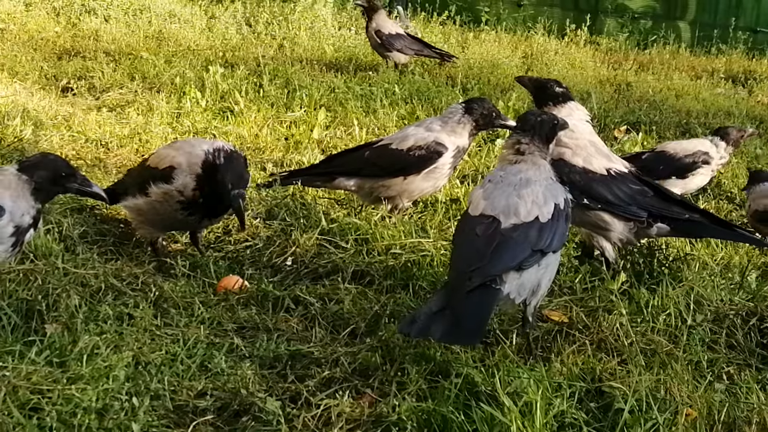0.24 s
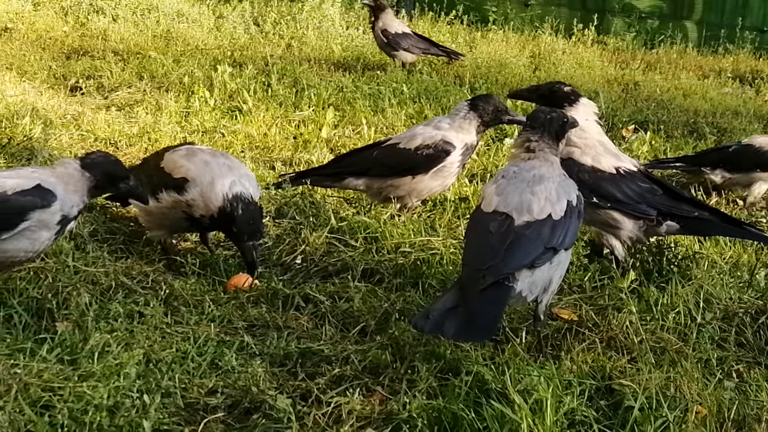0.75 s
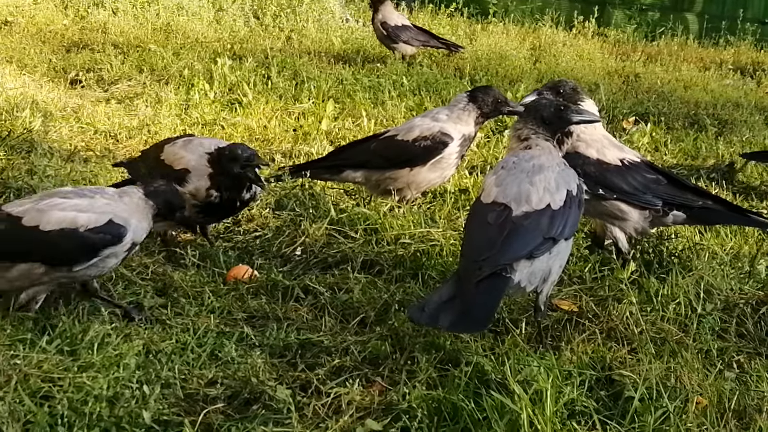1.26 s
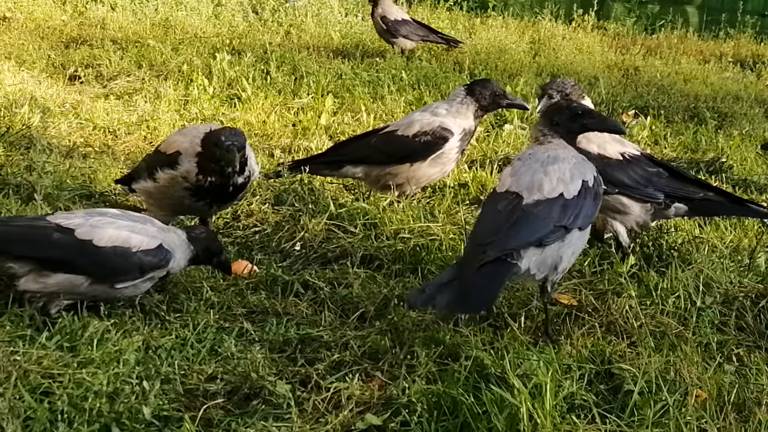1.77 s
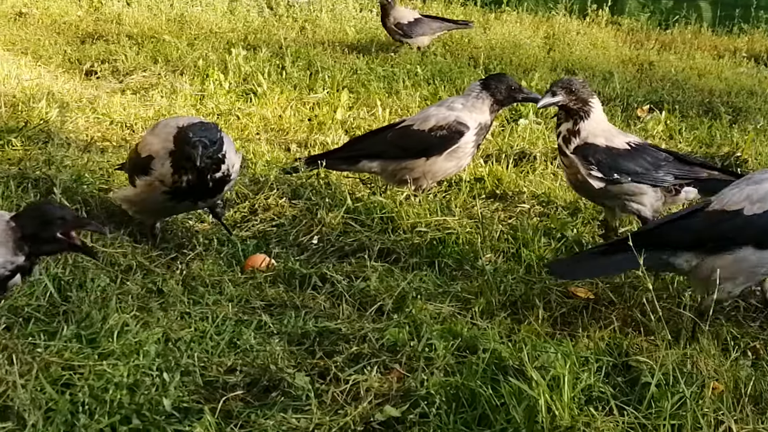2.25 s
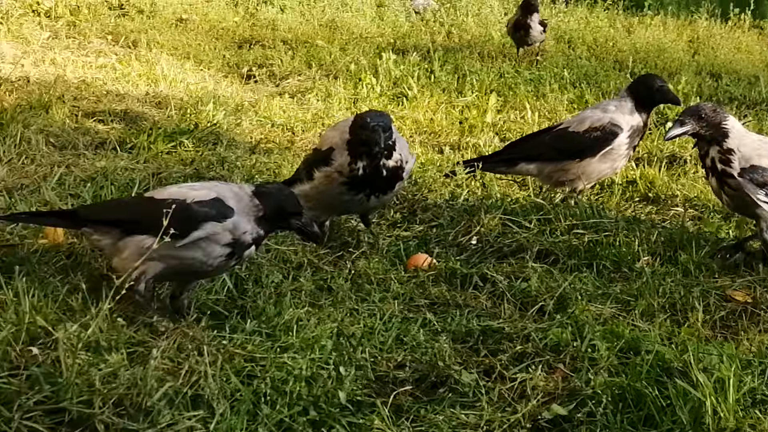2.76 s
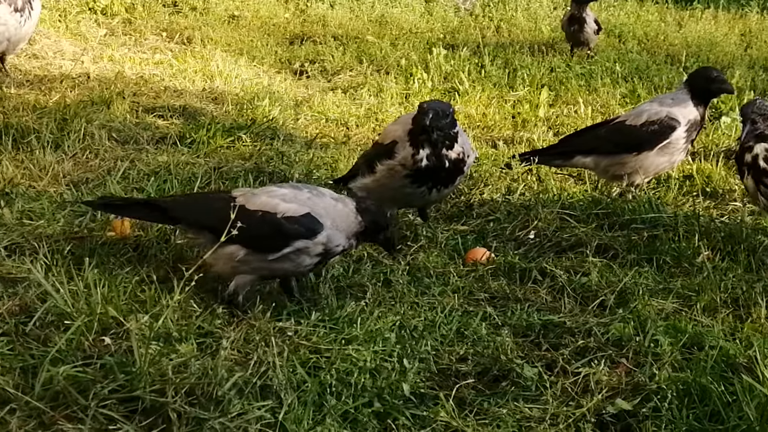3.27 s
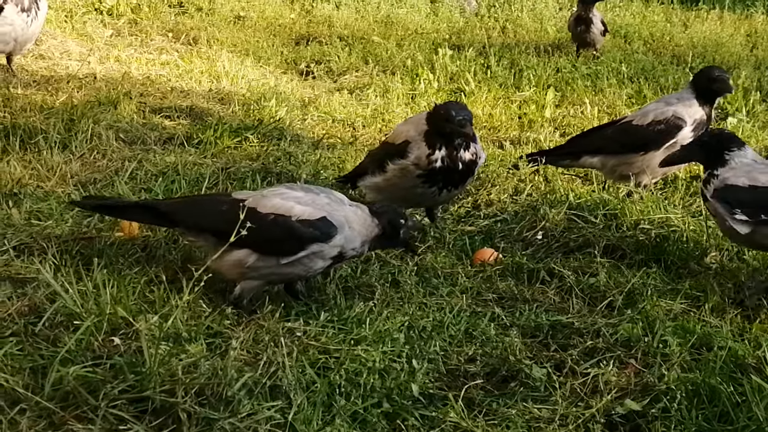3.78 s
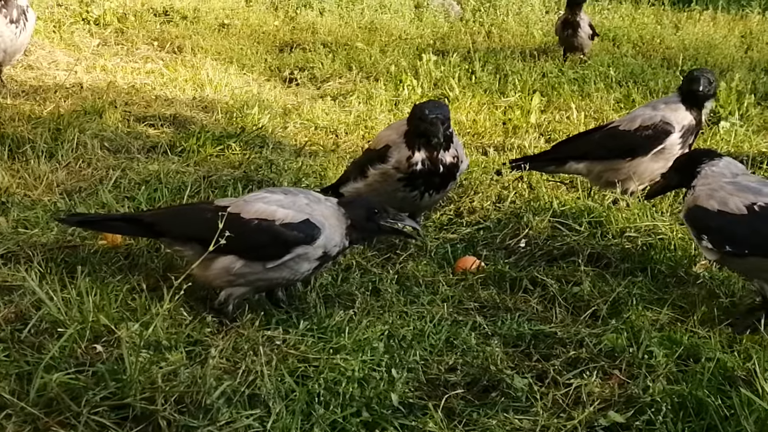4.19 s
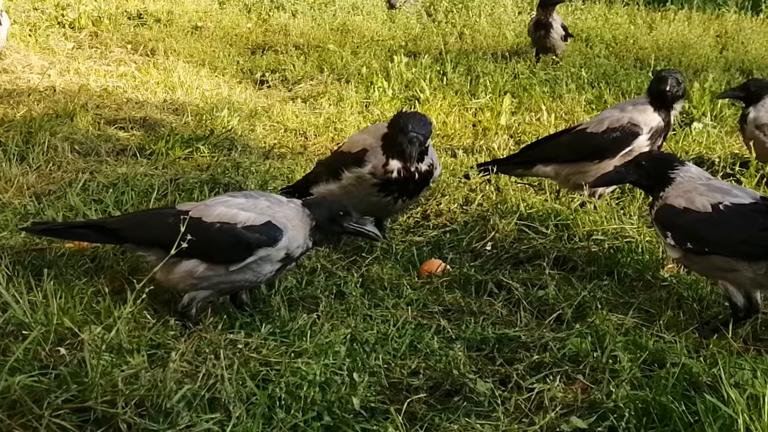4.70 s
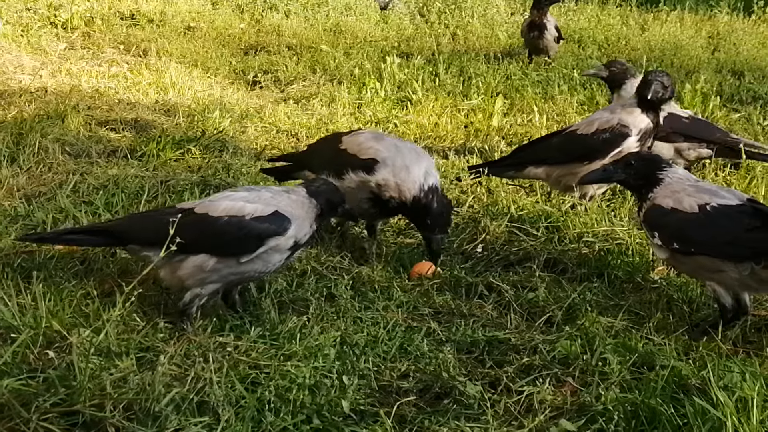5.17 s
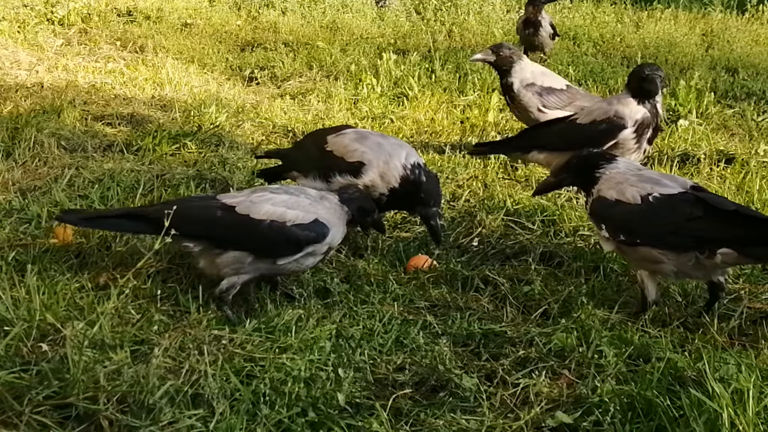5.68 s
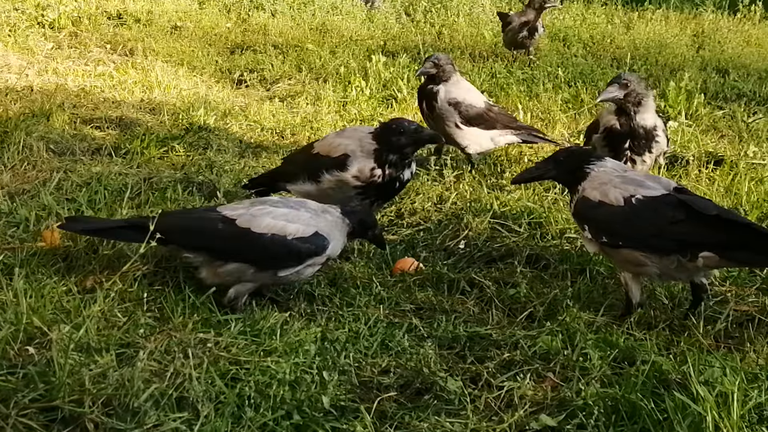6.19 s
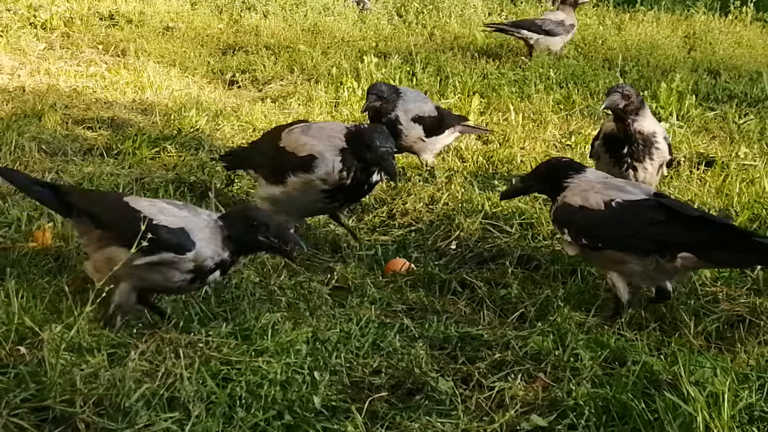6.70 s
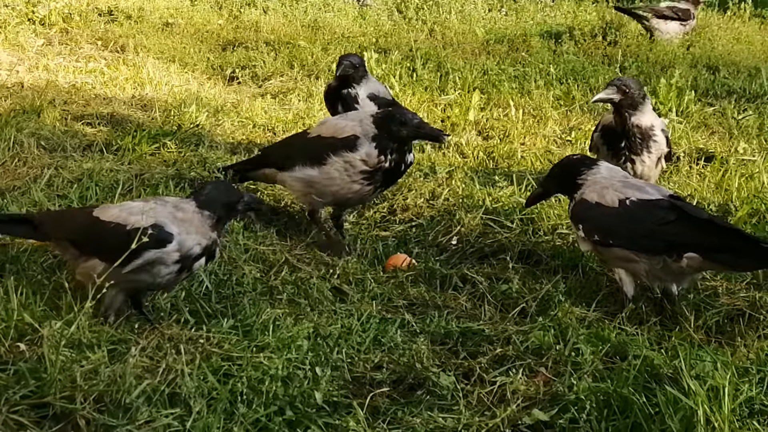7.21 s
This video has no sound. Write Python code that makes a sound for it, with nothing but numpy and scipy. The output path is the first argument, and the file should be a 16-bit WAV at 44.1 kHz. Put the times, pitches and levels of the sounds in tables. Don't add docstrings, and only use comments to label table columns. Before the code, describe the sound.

Quiet outdoor air with low traffic rumble and a light gust in the leaves. A few crows feed in grass: dry ticks, pecks and sharp beak snaps scattered left and right. Three brief, raspy, two-toned caws ring out, the first strongest, the second much softer, the third loud again, each with a faint diffuse return from lawn and trees. Low throaty mutters open and close the scene.

```python
import sys
import numpy as np
from scipy import signal
from scipy.fft import rfft, irfft
from scipy.io import wavfile
from scipy.ndimage import uniform_filter1d

SR = 44100
rng = np.random.default_rng(int(sys.argv[2]) if len(sys.argv) > 2 else 0)


def wrap_up_sound(samples):
    columns = np.atleast_2d(samples).T
    tamed = np.clip(columns, -1, 1)
    steps = np.round(tamed * 32767).astype(np.int16)
    wavfile.write(sys.argv[1], SR, steps)


def invert_db(x):
    u = np.asarray(x, float) / 20
    return 10 ** u


N = 328479

# time_s, level_db, pitch_hz
CAW_EFFORT = [
    [(2.015, -58, 207.7), (2.046, -34, 270.4), (2.07, -36, 262.4), (2.086, -31.5, 277.8),
     (2.12, -28.5, 302.3), (2.15, -33, 314.6), (2.23, -31.5, 352), (2.325, -33.5, 336.6), (2.381, -48, 276)],
    [(3.495, -52, 298.2), (3.501, -62.5, 298.4), (3.519, -46, 303.3), (3.579, -39.5, 320.1),
     (3.651, -41.5, 322), (3.699, -41.5, 329.6), (3.773, -42.5, 319.7), (3.883, -49, 290.6),
     (3.9, -66, 279)],
    [(6.667, -54, 201.8), (6.69, -39.5, 241), (6.721, -35, 288.3), (6.767, -34, 313.6),
     (6.879, -32.5, 338.9), (6.963, -36.5, 311), (6.983, -39, 295.5), (7.015, -46, 247), (7.03, -57, 230)],
]
# time_s, pitch_hz
UPPER_PITCH = [
    [(2.11, 322.1), (2.174, 408.4), (2.242, 431), (2.326, 431.3), (2.385, 344.5)],
    [(3.495, 374.5), (3.593, 409.8), (3.693, 430.6), (3.787, 432.3), (3.877, 365)],
    [(6.7, 353.5), (6.794, 410.8), (6.884, 420.4), (6.964, 390.7), (7.03, 319.4)],
]
# start_s, end_s, upper_to_lower_ratio
LOCKS = [
    (3.66, 3.785, 4 / 3),
    (6.82, 6.93, 5 / 4),
]
# size_beat (0-1), pull_cycles, beat_phase_rad, upper_level_db, upper_tilt
COUPLING = [(0.56, 0.076, 1, -0.5, 0.059), (0.42, 0.07, 0.9, 1, 0.92), (0.65, 0.051, 1, 0.5, 0.15)]
# ring_hz, width_hz, level_db
WINDPIPE = [
    [(1580, 46, -5), (2370, 210, 0), (5040, 270, -35), (4120, 66, -8)],
    [(1195, 39, -2), (1850, 28, 3.5), (3980, 98, -6.5), (2290, 130, -7), (4700, 140, -3.5)],
    [(1545, 29, 8), (2460, 200, 0.5), (4350, 50, -1), (5170, 110, -2)],
]
# fullest_chest_db, top_above_effort_db, aim_at_trees_db
POSTURE = [(-45, 0, -1.5), (-44, -1.5, 1), (-46, -6, -1.5)]
HOARSE_LOCKED = [.09, .11, .11]
HOARSE_BEATING = [.11, .17, .14]
# freq_hz, level_db
ONSET_COLOUR = ([(230, -20), (800, -9.5), (1130, -28), (1330, -15), (2000, -4), (2750, -18), (3300, -21),
                (3600, -40), (4000, -27), (4480, -19), (4820, -11), (5630, -12), (6090, -29), (7120, -27),
                (8050, -42), (9000, -42), (15160, -79)], [(230, -25), (800, -15), (1080, -31), (1330, -9),
                (1850, -4), (2150, -11), (2760, -25), (3900, -11), (4360, -27), (4820, -14), (5860, -10),
                (6200, -19), (7010, -20), (9070, -31), (15160, -54)])
FIRST_COLOUR = ( [(230, -16), (460, -10.5), (750, -16), (1090, -33), (1380, -9), (1900, 7), (3450, -24),
                (4250, -5), (4940, -5.5), (5970, -20), (6430, -13), (7300, -22), (7600, -30), (8100, -85),
                (9300, -38), (15160, -68)], [(230, -23), (340, -14.5), (1030, -24), (1490, 5), (1840, 6),
                (2180, -2), (2760, -15), (3050, -6), (3380, -18), (4050, -2), (4400, -9), (5600, -8),
                (6090, -15), (6600, -5), (11020, -40), (15160, -49)])
SECOND_COLOUR = ( [(230, -12.5), (1150, -14), (1450, -28), (1950, -8), (2500, -20), (3560, -16),
                 (4020, -7.5), (4940, -22), (5630, -10), (6320, -15), (6660, -27), (7500, -33), (8380, -48),
                 (15160, -68)], [(230, -20.5), (340, -14.5), (1950, -17), (2280, -10), (2760, -36),
                 (3100, -13), (3560, -18), (4020, -1), (4360, -10), (4820, -6), (5400, -18), (5630, -9),
                 (7460, -28.5), (15160, -58)])
THIRD_COLOUR = ( [(230, -11.5), (340, -8), (690, -10.5), (1130, -25), (1550, -10), (1980, 5), (2400, -8),
                (3100, -17), (3650, -19), (4250, 1), (4600, 0), (5510, 6.5), (6090, -12), (7350, -8),
                (7950, -16), (8300, -22), (9000, -62), (9600, -44), (15160, -62)], [(230, -20),
                (340, -10.5), (950, -15), (1130, -25), (1490, -3), (2070, 2), (2500, -16), (2800, -20),
                (3100, -10), (3330, -14), (3900, 2), (4590, 0), (5510, 7), (7690, -12), (8040, -10),
                (15160, -47)])
# freq_hz, phase_rad
PORT_TURN = [
    [(300, .37), (950, 1), (1150, .2), (1400, .6), (1900, .2), (2350, -1.05), (2700, -.8), (2900, -.25),
     (3400, -3.2), (3600, -2), (3900, -5.6), (4200, -6.2), (4500, -5.65), (5000, -5.1), (6700, -3.3)],
    [(300, .35), (1500, 1.55), (1850, -.15), (2050, -.2), (2600, -1.95), (3000, .85), (3500, -.75),
     (3620, 1.35), (4250, -.2), (4400, -3.2), (5050, -6.4), (5400, -3.4), (5750, -3), (6650, -1.4)],
    [(300, .26), (1100, .9), (1250, .25), (1550, .55), (1900, -.1), (2100, -.2), (2400, -1.95),
     (2900, -.05), (3550, -3.7), (3700, -2.2), (4150, -6.2), (4800, -5.45), (5300, -5.1), (5650, -4.2),
     (6500, -3.5)],
]
ONSET_TURN = [(300, .35), (1000, .8), (1400, .8), (1900, .1), (2250, -1.15), (2500, -.6), (2850, .3),
              (3200, -2.3), (3900, -5), (4500, -5.1), (5000, -4.8), (5900, -3.4), (7000, -2.5)]
CAW_LAG_MS = [0.3, 0.24, 0.26]

# start_s, length_s, start_level_db, end_level_db, chest_db
MUTTERS = [(0.016, 0.014, -56, -58, -58), (0.028, 0.098, -46, -69, -59), (0.109, 0.153, -66, -74, -70.5),
           (2.886, .045, -79, -83, -80), (2.982, 0.035, -84, -70, -66.5), (3.013, .03, -72, -86, -67),
           (6.416, 0.13, -84, -69.5, -58), (6.536, 0.14, -67.5, -65, -57), (7.074, 0.159, -88, -58, -61.5),
           (7.211, 0.017, -52, -55, -53.5), (7.224, 0.041, -55, -49.5, -52.5),
           (7.26, 0.042, -53, -60, -58.5), (7.291, 0.083, -59.5, -63, -60.5),
           (7.36, 0.033, -52, -65, -58.5), (7.386, 0.059, -58, -61.5, -59.5),
           (7.436, 0.013, -53, -46.5, -77)]
# time_s, pitch_hz
MUTTER_PITCH = [(0, 204.5), (3.1, 203.4), (6.42, 183.3), (6.45, 214.4), (6.49, 199.5), (6.57, 212),
                (6.66, 182.8), (7.07, 181), (7.11, 232), (7.142, 184.2), (7.18, 224.8), (7.25, 207),
                (7.325, 233.3), (7.345, 280.7), (7.45, 269.5)]
# freq_hz, level_db
MUTTER_COLOURS = [([(230, -11.5), (570, -12.5), (850, -29), (1500, -33.5), (2070, -36.5), (3000, -30.5),
                  (3750, -31), (4130, -32), (4820, -46), (5400, -32), (6430, -52), (15160, -76)],
                  [(230, -20), (460, -7.5), (880, -33), (1200, -28), (1550, -38), (1980, -45),
                  (2530, -31.5), (2900, -29), (3680, -23), (4250, -48), (7350, -29.5), (7810, -75),
                  (15160, -73)]), ([(230, -16.5), (570, -15.5), (1720, -34), (2300, -22), (2870, -21),
                  (3680, -40), (4590, -29), (5400, -35), (6200, -36), (15160, -82)], [(230, -22.5),
                  (570, -16.5), (2760, -39.5), (3560, -19.5), (4360, -47), (5400, -23), (5740, -38),
                  (7580, -27), (8040, -41), (15160, -59)]), ([(230, -26.5), (800, -30), (1490, -13.5),
                  (2300, -16.5), (2850, -28), (3300, -34), (4590, -20), (5400, -46), (6090, -29),
                  (6890, -70), (15160, -58)], [(230, -23.5), (460, -9), (1150, -32.5), (1380, -10.5),
                  (1840, -31), (2300, -18), (3330, -37), (4600, -26), (5280, -28), (6000, -29), (6900, -29),
                  (15160, -83)])]
MUTTER_LAG_MS = [0.16, 0.23, -0.31]
MUTTER_TOP_DB = [-11, 0.5, 6.5, -1, -9]
PHRASE_BORDERS_S = [1, 6, 6.5, 7]
PHRASE_BIRD = [0, 1, 1, 1, 2]
BEAK_RING_HZ = [3850, 3770, 4620]
SECOND_RING_HZ = [1600, 4100, 6000]

# time_s, peak_db, left_right_db, low_hz, top_hz
CLICKS = [(0.035, -37, 3, 1000, 4500), (.0635, -57, -2, 4800, 7800), (.9588, -38, -13, 3030, 5000),
          (.9588, -46.5, -13, 4700, 7560), (2.44, -50, -3, 700, 7000), (2.56, -55, 13, 3560, 6300),
          (4.2138, -52, -12, 900, 6000), (5.0908, -50.5, -9, 4800, 7600), (5.9727, -57, -2, 1800, 8850),
          (6.6668, -42, 0, 1200, 8940)]
# time_s, peak_db, left_right_db, ring_hz, ring_t60_s
TICKS = [(.064, -47.5, -3, 5530, 0.31), (.332, -59, 6, 2340, 0.39), (0.3623, -53, 2, 2300, .05),
         (0.8435, -57, 3, 5200, .02), (0.8524, -51, 4, 2290, 0.059), (0.875, -59, -7, 5500, .03),
         (0.9543, -51.5, -6, 2100, 0.12), (0.962, -47, -13, 4100, 0.032), (0.974, -48, -2, 4000, 0.092),
         (0.9981, -53, -2, 4020, 0.06), (1.013, -58, -4, 3900, .05), (1.3475, -55, -5, 5000, .03),
         (1.5577, -58, -8, 2100, .03), (2.434, -54, -12, 2059, 0.057), (3.013, -53.5, 3, 2660, 0.13),
         (3.015, -57, -3, 4700, 0.072), (3.2897, -56, -10, 2250, .03), (4.2172, -53, -6, 3520, 0.03),
         (5.023, -49.5, -4, 2360, 0.024), (5.091, -50, -5, 1600, 0.04), (5.4185, -62, -10, 2030, .03),
         (6.3803, -63, 7, 2520, 0.023), (7.437, -51, -12, 7040, 0.27)]
# time_s, peak_db, left_right_db
SNAPS = [(2.7671, -70, -9), (3.1353, -71, 10), (5.973, -81, -8), (7.4424, -58, -5)]
# freq_hz, level_db
LAWN = [(400, -25), (1500, 13.5), (2300, 11), (3300, 12.5), (4500, 7.5), (5500, 11.5), (7000, 16.5),
        (8000, 21), (10000, -23)]
TREE_ECHO = [(300, -24), (900, -14), (1500, 0), (2000, -1), (2600, 0), (3200, -13), (6000, -20),
             (9000, -32)]
# freq_hz, density_db_per_hz
RUMBLE = [(8.2, -51), (14, -16.5), (27, -8.5), (40, -14), (70, -0.5), (118, -9.5), (215, -14), (275, -19),
          (304, -18.5), (341, -21.5), (505, -26.5), (700, -28), (910, -61), (1540, -120)]
LEAVES = [(380, -32), (650, -5), (825, -2), (954, -1.5), (1160, -5), (1340, -6), (2160, -12.5),
          (2440, -14.5), (2780, -18), (5680, -21.5), (9890, -30.5), (15300, -54)]
# freq_hz, likeness (-1 to 1)
COHERENCE = [(60, 0.94), (130, 0.9), (290, 0.83), (640, 0.46), (1400, -0.53), (3090, 0.058), (6790, -0.022),
             (14900, -0.33)]
# freq_hz, left_right_db
BALANCE = [(60, -1), (180, -2), (550, 0), (1640, -6), (4960, -0.5), (14900, -7)]

ONSET_ENDS_S = 2.118
UPPER_FREE, UPPER_LOCKED = 0.74, 0.76
UPPER_WOBBLE, SLIP_WOBBLE = .013, .04
SLIP_HOARSE, SLIP_S = .1, .022
HOARSE_ENDS, HOARSE_SPREAD_S, HOARSE_ALONE = .29, .014, .022
CHEST_LEAD_DB, CHEST_TRAIL_DB, CHEST_TURN_S = 9.5, -4, 0.024
TOP_FULL_DB, TOP_FADE_DB = -37.5, -3
RINGS_FOLLOW = 0.19
MUTTER_HOARSE, MUTTER_WOBBLE, CHEST_FOLLOWS = .31, 0.036, 0.39
RISE_SHARE = .1
RING_HZ, RING_WIDTH_HZ, RING_DB, BEAK_WIDTH_HZ = 2320, 150, 5, 210
CLICK_T60_S = 0.0093
SCUFF_SHARE, PECK_SHARE, PECK_ABOVE_HZ = .1, .1, 3200
TREES_S, TREES_SPREAD_S = .17, .065
AIR_DB, LEAVES_DB, SWELL_DB = -51.5, -24, 1
STILL_DB, GUST_DB, GUST_GRASS_DB = -18.5, 5.5, 2.5
GUST_START_S, GUST_RISE_S, GUST_END_S, GUST_FALL_S = 1.73, 0.67, 3.42, 0.16


def caw(k):
    s, effort_db, pitch_hz = np.transpose(CAW_EFFORT[k])
    t = np.arange(s[0], s[-1], 1 / SR)
    beak_db = np.interp(t, s, effort_db)
    along = (t - s[0]) / (s[-1] - s[0])
    full_db, top_db, aim_db = POSTURE[k]
    lead_db = CHEST_TRAIL_DB + (CHEST_LEAD_DB - CHEST_TRAIL_DB) * np.exp(-(t - s[0]) / CHEST_TURN_S)
    chest_db = np.minimum(full_db, beak_db + lead_db)
    top_db = np.minimum(TOP_FULL_DB, beak_db + top_db + TOP_FADE_DB * along ** 3)

    upper_start = UPPER_PITCH[k][0][0]
    rough = np.interp(t - upper_start, [0, .03], [HOARSE_ALONE, HOARSE_BEATING[k]])
    rough = rough + SLIP_HOARSE * slipping(t)
    for start, end, ratio in LOCKS:
        rough = rough + locking(t, start, end) * (HOARSE_LOCKED[k] - rough)
    nearest_end = np.minimum(t - s[0], s[-1] - t)
    rough = rough + (HOARSE_ENDS - rough) * np.exp(-nearest_end / HOARSE_SPREAD_S)

    colours = (FIRST_COLOUR, SECOND_COLOUR, THIRD_COLOUR)[k]
    sound = call(t, (chest_db, beak_db, top_db), np.interp(t, s, pitch_hz), rough, colours, CAW_LAG_MS[k],
                 upper=UPPER_PITCH[k], coupling=COUPLING[k], rings=WINDPIPE[k],
                 onset=ONSET_COLOUR if k == 0 else None, turn=PORT_TURN[k])
    return sound, invert_db(aim_db)


def mutter(start, length, from_db, to_db, chest_db):
    t = np.arange(start, start + length, 1 / SR)
    phrase = np.searchsorted(PHRASE_BORDERS_S, start)
    bird = PHRASE_BIRD[phrase]
    beak_db = np.linspace(from_db, to_db, len(t))
    chest_db = chest_db + CHEST_FOLLOWS * (beak_db - beak_db.mean())
    levels = chest_db, beak_db, beak_db + MUTTER_TOP_DB[phrase]
    wobble = MUTTER_WOBBLE * wander(SR, 857)[:len(t)]
    hz = np.interp(t, *np.transpose(MUTTER_PITCH)) * (1 + wobble)
    rings = [(RING_HZ, RING_WIDTH_HZ, RING_DB),
             (BEAK_RING_HZ[bird], BEAK_WIDTH_HZ, RING_DB),
             (SECOND_RING_HZ[bird], BEAK_WIDTH_HZ, RING_DB)]
    rough = np.full(len(t), MUTTER_HOARSE)
    sound = call(t, levels, hz, rough, MUTTER_COLOURS[bird], MUTTER_LAG_MS[bird], rings=rings)
    rise_s = min(2 * RISE_SHARE * length, .015)
    return sound * np.minimum(np.minimum(t - start, t[-1] - t) / rise_s, 1)


def call(t, levels_db, hz, rough, colours, lag_ms, upper=None, coupling=None, rings=(), onset=None, turn=None):
    edge = np.clip((t - t[0]) / 0.00028, 0, 1) * np.clip((t[-1] - t) / 0.0023, 0, 1)
    drive = folds(t, hz, rough, upper, coupling) * edge
    for ring_hz, width, ring_db in rings:
        ring_hz = ring_hz * (hz / hz.max()) ** RINGS_FOLLOW
        drive = drive + invert_db(ring_db) * resonate(drive, ring_hz, width)
    drive = bounce(drive, 70, .68)
    ports = at_ports(drive, colours, lag_ms, turn)
    if onset:
        early = np.clip((ONSET_ENDS_S - t) / .05 + .5, 0, 1)
        ports = ports * (1 - early) + early * at_ports(drive, onset, lag_ms, ONSET_TURN)

    f, z = np.fft.rfftfreq(len(t), 1 / SR), rfft(ports)
    chest = 1 / (1 + (f / 1100) ** 8)
    top = 1 - 1 / (1 + (f / 3400) ** 12)
    out = 0
    for share, db in zip((chest, 1 - chest - top, top), levels_db):
        band = irfft(z * share, len(t))
        level = np.sqrt(uniform_filter1d((band ** 2).mean(0), 2600, mode="reflect") + 1e-12)
        out = out + invert_db(db + 5.5) * band / level
    return out


def folds(t, hz, rough, upper, coupling):
    turns = np.cumsum(hz) / SR
    voiced = pulses(turns + .1 * rough * wander(len(t), 90), hz)
    if upper is not None:
        throb, pull, phase, upper_db, tilt = coupling
        s, upper_hz = np.transpose(upper)
        locked = sum(locking(t, start, end) for start, end, ratio in LOCKS)
        strength = np.clip((t - s[0]) / 0.0043, 0, 1) * (UPPER_FREE + (UPPER_LOCKED - UPPER_FREE) * locked)
        wobble = (UPPER_WOBBLE + SLIP_WOBBLE * slipping(t)) * wander(len(t), 483)
        upper_hz = np.interp(t, s, upper_hz) * (1 + wobble)
        for start, end, ratio in LOCKS:
            upper_hz = upper_hz + locking(t, start, end) * (ratio * hz - upper_hz)
        upper_turns = np.cumsum(upper_hz) / SR
        beat = 2 * np.pi * (upper_turns - turns)
        shake = pull * strength * np.sin(beat) + .1 * rough * wander(len(t), 90)
        voiced = pulses(turns + shake, hz) * (1 + throb * strength * np.cos(beat + phase))
        voiced += invert_db(upper_db) * strength * pulses(upper_turns + shake / 2, upper_hz, max(tilt, 0))
    voiced = voiced * invert_db(6 * rough * wander(len(t), 70))
    puffs = (.4 + np.exp(-(turns % 1) / .3)) * rng.standard_normal(len(t))
    puffs = signal.lfilter(*signal.butter(2, 800, "high", fs=SR), puffs)
    return -(1 - rough) * voiced + 9 * rough * puffs


def pulses(turns, hz, tilt=0.):
    out = 0
    for k in range(1, 60):
        out = out + np.cos(2 * np.pi * k * turns) * (k * hz < 15500) / k ** tilt
    return out


def locking(t, start, end):
    return np.clip(np.minimum(t - start, end - t) / 0.017, 0, 1)


def slipping(t):
    out = 0
    for start, end, ratio in LOCKS:
        for at in (start - SLIP_S, end + SLIP_S):
            out = out + np.exp(-((t - at) / SLIP_S) ** 2)
    return out


def resonate(x, hz, width):
    turn = np.exp(2j * np.pi * np.cumsum(hz) / SR)
    r = np.exp(-np.pi * abs(width) / SR)
    return 2 * (turn * signal.lfilter([1 - r], [1, -r], x / turn)).real


def bounce(x, delay, gain):
    b = np.r_[gain, np.zeros(delay - 1), 1]
    return signal.lfilter(b, b[::-1], x)


def at_ports(drive, colours, lag_ms, turn):
    left, right = colours
    return np.array([colour(drive, left), colour(drive, right, lag_ms, turn, left)])


def colour(x, points, lag_ms=0., turn=None, like=None):
    hz = np.fft.rfftfreq(4096, 1 / SR)
    floor = np.sqrt(1 + (215 / (hz + 1)) ** 10)
    gain = np.log(invert_db(read(points, hz)) / floor)
    shape = np.log(invert_db(read(like, hz)) / floor) if turn else gain
    phase = -signal.hilbert(np.r_[shape, shape[-2:0:-1]]).imag[:len(hz)]
    phase = phase - 2 * np.pi * hz * (lag_ms + 1.5) / 1000
    if turn:
        phase = phase + read(turn, hz)
    response = irfft(np.exp(gain + 1j * phase))[:2048]
    return signal.oaconvolve(x, response)[:len(x)]


def clicks():
    out, t = np.zeros((2, N)), np.arange(2000) / SR
    for s, db, pan_db, low_hz, top_hz in CLICKS:
        burst = np.sign(rng.standard_normal(len(t))) * invert_db(-60 * t / CLICK_T60_S)
        burst = signal.sosfilt(signal.butter(3, [low_hz, top_hz], "band", fs=SR, output="sos"), burst)
        add(out, s, port_gain(db, pan_db) * burst)
    return out


def ticks():
    out, t = np.zeros((2, N)), np.arange(6000) / SR
    click_band = signal.butter(4, [1900, 7800], "band", fs=SR, output="sos")
    for s, db, pan_db, hz, t60 in TICKS:
        noise = rng.standard_normal((2, len(t)))
        broad = PECK_SHARE if hz > PECK_ABOVE_HZ else SCUFF_SHARE
        ring = signal.sosfilt(signal.butter(2, [hz / 1.08, hz * 1.08], "band", fs=SR, output="sos"), noise)
        ring = evened(ring) * invert_db(-60 * t / max(t60, .003))
        click = signal.sosfilt(click_band, noise * invert_db(-60 * t / 0.021))
        sound = (1 - broad) * ring + 2.0 * broad * click
        add(out, s - .0005, port_gain(db - 6.0, pan_db) * sound)
    for s, db, pan_db in SNAPS:
        snap = np.diff(rng.standard_normal((2, len(t))), prepend=0) * invert_db(-60 * t / 0.0098)
        add(out, s, port_gain(db, pan_db) * snap)
    return out


def trees(x):
    t = np.arange(SR // 2) / SR
    near = (t > .008) * invert_db(-60 * t / .3)
    far = np.exp(-((t - TREES_S) / TREES_SPREAD_S) ** 2) * (t > .02) * invert_db(5 * wander(len(t), 500))
    out = 0
    for shape, db, points in ((near, -24, LAWN), (far, -30, TREE_ECHO)):
        tail = invert_db(db) * shape / np.linalg.norm(shape) * rng.standard_normal((2, len(t)))
        out = out + signal.fftconvolve(colour(x[0], points)[None], tail, axes=1)[:, :N]
    return out


def air():
    frames, hz = N // 512 + 6, np.fft.rfftfreq(2048, 1 / SR)[:, None]
    a, b, c, d, patches = rng.standard_normal((frames, 1025, 5)).T
    patches = evened(uniform_filter1d(uniform_filter1d(patches, 20, 0), 8, 1))
    t = np.arange(frames) * 512 / SR
    gust = np.minimum((t - GUST_START_S) / GUST_RISE_S, (GUST_END_S - t) / GUST_FALL_S)
    gust = np.clip(gust, 0, 1)
    swell_db = SWELL_DB * wander(frames, 10) / (1 + (hz / 300) ** 2)
    rustle_db = (STILL_DB + GUST_DB * gust) / (1 + (10000 / (hz + 1)) ** 6)
    grass_db = GUST_GRASS_DB * gust / (1 + (3000 / (hz + 1)) ** 4)

    colour_db = np.where(hz < 680, read(RUMBLE, hz), read(LEAVES, hz) + LEAVES_DB)
    microphone_hiss = invert_db(2 * -50.0) / (1 + (11500 / (hz + 1)) ** 12)
    colour_db = 10 * np.log10(invert_db(2 * colour_db) + microphone_hiss)
    same, left = np.clip(read(COHERENCE, hz), -1, 1), a + 1j * b
    z = np.array([left, same * left + np.sqrt(1 - same ** 2) * (c + 1j * d)])
    z *= invert_db(colour_db + 0.15 * patches + swell_db + rustle_db + grass_db)
    z *= invert_db(np.multiply.outer([.5, -.5], read(BALANCE, hz)))
    x = signal.istft(z, nperseg=2048, noverlap=1536)[1][:, :N]
    return invert_db(AIR_DB) * x / np.sqrt(np.mean(x.mean(0) ** 2))


def wander(size, smooth):
    drift = uniform_filter1d(rng.standard_normal(size), int(smooth))
    return evened(uniform_filter1d(drift, int(smooth)))


def evened(x):
    return x / np.sqrt(np.mean(x ** 2) + 1e-20)


def read(points, hz):
    f, value = np.transpose(points)
    return np.interp(np.log(hz + 1), np.log(f + 1), value)


def port_gain(db, pan_db):
    return invert_db(db + np.array([[pan_db / 2], [-pan_db / 2]]))


def add(mix, s, sound):
    part = mix[:, round(s * SR):][:, :sound.shape[1]]
    part += sound[:, :part.shape[1]]


def scene():
    crows, thrown = np.zeros((2, 2, N))
    for k, rows in enumerate(CAW_EFFORT):
        sound, aim = caw(k)
        add(crows, rows[0][0], sound)
        add(thrown, rows[0][0], aim * sound)
    for row in MUTTERS:
        sound = mutter(*row)
        add(crows, row[0], sound)
        add(thrown, row[0], sound)
    return crows + trees(thrown) + clicks() + ticks() + air()


def top_cut(x):
    return signal.sosfilt(signal.butter(12, 15140, fs=SR, output="sos"), x)


def record(dry):
    rounded = .4 * np.tanh(dry / .4)
    return top_cut(rounded)


dry = scene()
out = record(dry)
wrap_up_sound(out)
```